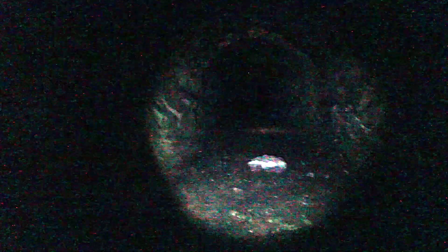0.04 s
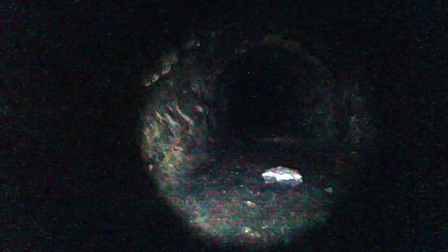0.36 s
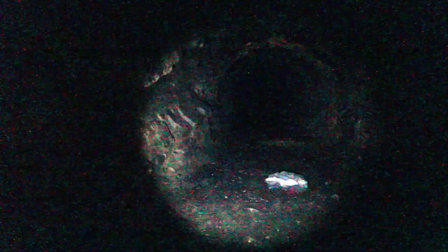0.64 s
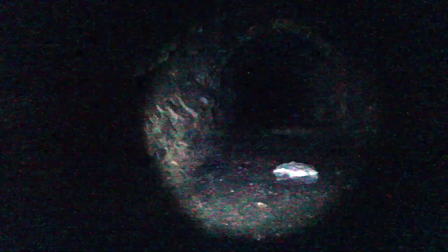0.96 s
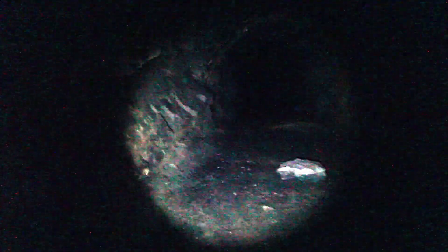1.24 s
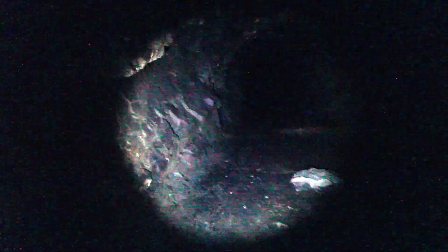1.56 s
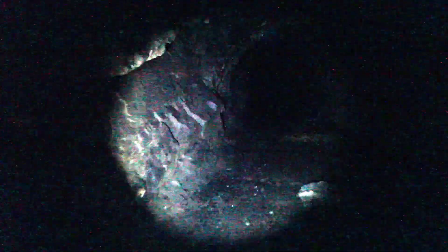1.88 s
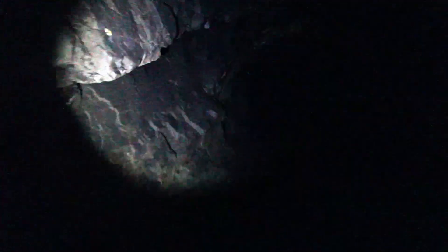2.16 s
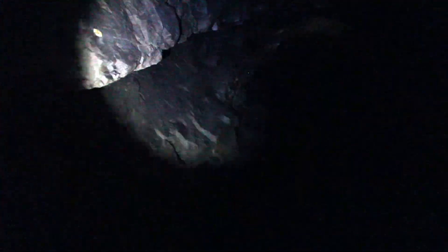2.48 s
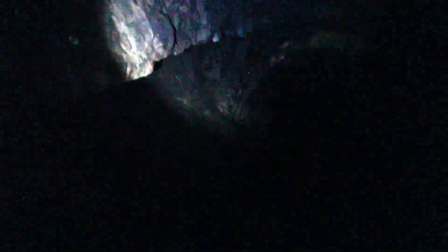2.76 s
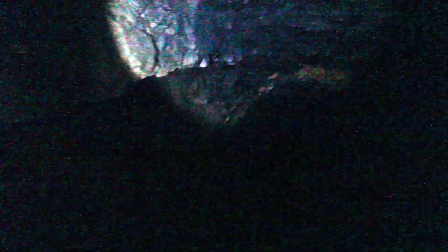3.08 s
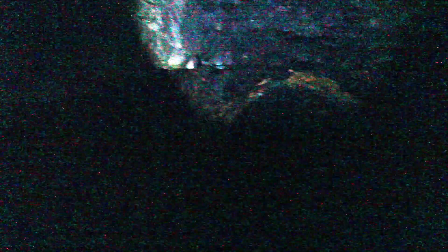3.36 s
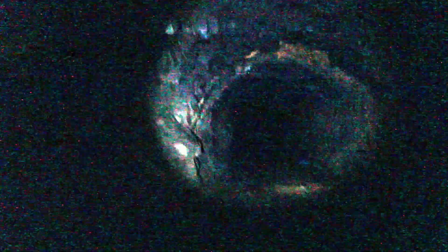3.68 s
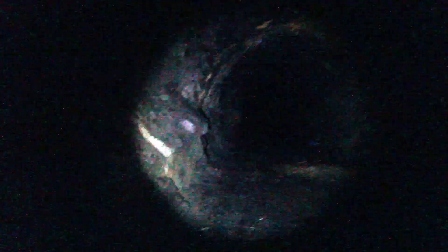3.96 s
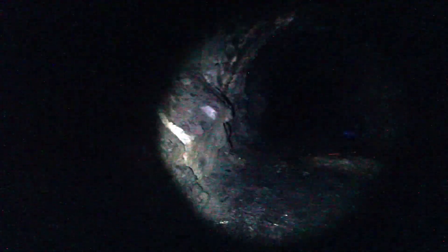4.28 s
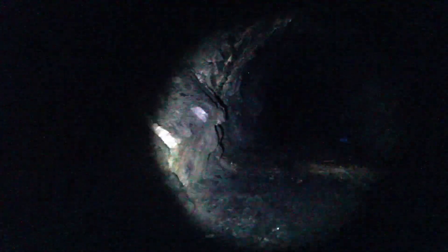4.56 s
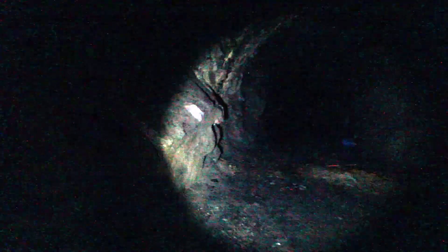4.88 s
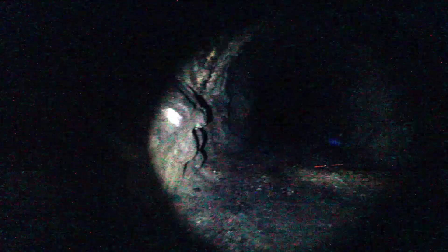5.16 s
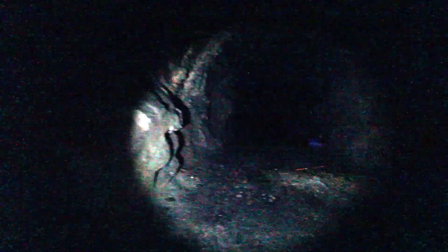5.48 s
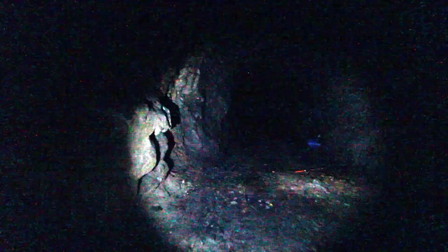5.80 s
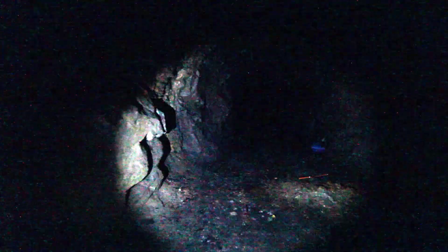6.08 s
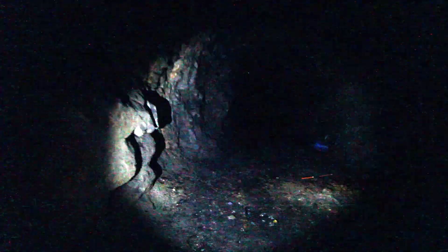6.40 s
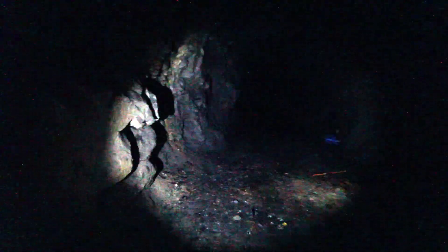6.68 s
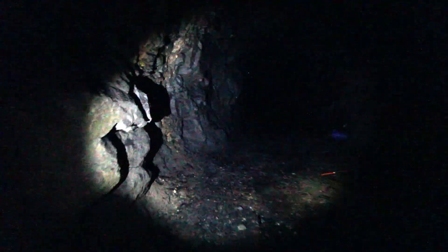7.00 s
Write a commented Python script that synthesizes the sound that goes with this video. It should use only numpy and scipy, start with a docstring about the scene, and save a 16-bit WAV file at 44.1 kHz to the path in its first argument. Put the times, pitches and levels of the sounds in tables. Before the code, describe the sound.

Slow, uneven footsteps crunch and scuff on grit in a rock tunnel, heard close from a microphone in the walker's hand. The walls ring for about a second, and a faint steady hiss lies underneath. The first steps are light, with small pebble clicks, followed by a firmer crunch and clatter around 1.7 seconds. At 2.8 seconds a flat stone tips with a loud hollow knock and grinds briefly as it rocks; another sharp knock follows at 3.1. Quieter steps and clicks continue until several stones clack together between 4.7 and 5 seconds. A heavier step lands at 5.7, and more hollow knocks come from 6.5 to 6.7, with a last scuff near 6.9. A sleeve swishes briefly around 0.8, 3.2 and 4.7 seconds. Soft low bumps of the hand on the microphone come mostly from 4.5 seconds onward.

```python
"""Slow footsteps in a rock tunnel

Grit and loose stones underfoot, heard close from the microphone of a camera in the walker's hand.
Each boot crunches and scuffs, pebbles click, flat stones tip with a hollow knock, and one grinds as
it rocks. Farther out, the rock walls ring on for about a second. Right at the microphone, the hand
bumps the camera softly and a sleeve brushes past, over a faint steady hiss."""
import sys
import numpy as np
from scipy import signal
from scipy.io import wavfile
from scipy.ndimage import uniform_filter1d

SR = 44100
rng = np.random.default_rng(int(sys.argv[2]) if len(sys.argv) > 2 else 0)


def put_to_file(sound):
    """Save the sound as 16-bit audio at rate SR, in the file named by the first command-line argument."""
    columns = np.atleast_2d(sound).T  # one column per channel
    safe = np.clip(columns, -1, 1)
    whole_steps = np.round(safe * 32767)
    wavfile.write(sys.argv[1], SR, whole_steps.astype(np.int16))


N = 314874
TIME = np.arange(N) / SR

# a heel, sole or toe meeting the grit:
# start_s, hold_s, crunch_db, weight_db, rasp_db, fizz_db, sliding_over_pressed_db
FOOTFALLS = [(0.076, 0.098, -47, -50.5, -52.5, -63, -1.5), (.585, 0.028, -55.5, -73, -74, -75, -17),
             (0.864, 0.1, -42, -57.5, -49.5, -54, 2.5), (0.985, 0.032, -44, -48, -54, -68, 1),
             (1.202, 0.027, -50, -53.5, -63, -72, -8), (1.455, .01, -43.5, -69, -53.5, -66, 9),
             (1.601, 0.11, -42.5, -49, -53.5, -70, -0.5), (1.673, .03, -49, -50, -56, -57, 4),
             (1.725, 0.016, -29.5, -55, -44.5, -56, 8), (1.787, 0.045, -37, -50, -45, -55.5, -22),
             (2.453, 0.018, -46, -46.5, -47.5, -55.5, 1), (2.567, 0.026, -41, -53, -52, -70, 0.5),
             (2.69, 0.11, -53, -53, -59, -60, -12), (2.785, 0.034, -47, -64, -56, -74, 6),
             (3.145, 0.015, -34, -44.5, -42, -53, 10), (3.268, 0.063, -36.5, -50, -49, -58, 1),
             (3.854, 0.18, -47.5, -67, -53, -65, 5), (4.059, 0.0086, -37.5, -53.5, -46, -54, 6),
             (4.125, .04, -41.5, -71, -47.5, -56.5, 6), (4.296, 0.087, -44.5, -59.5, -57, -72, 17),
             (4.683, 0.12, -47, -44, -50.5, -59, 16), (4.88, 0.063, -34, -47, -45.5, -53, -0.5),
             (5.156, 0.091, -48, -53.5, -60, -63, 0), (5.506, 0.16, -53.5, -76, -61.5, -64, 0),
             (5.604, .02, -54, -72, -56, -70, 5), (5.684, 0.042, -35.5, -42.5, -47, -56, 3),
             (5.81, 0.041, -44.5, -54, -67, -66, -13), (6.1, 0.22, -47, -58.5, -52, -60, 0.5),
             (6.387, .02, -48, -52.5, -49.5, -61, 3), (6.474, 0.047, -35.5, -39.5, -46.5, -54, -2.5),
             (6.606, 0.023, -37, -43.5, -45, -53.5, -1), (6.88, 0.13, -46, -51.5, -53, -62, 3)]
# spectra of the parts of a step: frequency_hz, gain_db
PRESSED_GRIT = [(300, -25), (480, -14), (600, 3.5), (850, 7), (1100, 4), (1400, -4), (2200, -35.5)]
SLIDING_GRIT = [(750, -18), (1150, 3.5), (1550, 1.5), (1900, -2), (2500, -8.5), (3300, -37.5)]
SOLE_WEIGHT = [(70, -20.5), (150, -0.5), (210, -3), (270, 4), (350, 5.5), (440, 4.5), (540, 0.5),
               (750, -46)]
SAND_RASP = [(1900, -21), (2550, 2), (3000, 1), (3800, -3.5), (5800, -9), (7500, -37)]
DUST_FIZZ = [(4200, -18.5), (5500, 5.5), (7000, 3.5), (9500, -4), (13000, -8), (16000, -15)]
# stones struck by a boot or by each other: start_s, level_db, pitch_hz, thud_db, dullness_db_per_octave
KNOCKS = [(0.0768, -41.5, 550, -62, 11), (.0992, -39.5, 800, -60, 17), (0.147, -32.5, 1830, -44, 45),
          (0.2811, -44.5, 2600, -70, 19), (0.4135, -45.5, 2780, -66, 34), (0.4619, -42.5, 1400, -39.5, 10),
          (0.5748, -43.5, 550, -56, 12), (0.7155, -49.5, 900, -70, 9), (0.8564, -36, 1770, -47, 28),
          (1.4602, -35.5, 1420, -39.5, 17), (1.6169, -31, 660, -52, 12), (1.7344, -25.5, 1130, -50, 19),
          (1.7391, -30.5, 2100, -65, 29), (1.7712, -25, 1350, -57, 27), (1.839, -34.5, 1600, -52, 14),
          (2.3668, -38, 1800, -41.5, 11.5), (2.3915, -36.5, 900, -36.5, 16), (2.457, -62, 500, -37.5, 15),
          (2.5886, -32.5, 1120, -68, 23), (2.809, -13, 1180, -33, 16.5), (2.815, -15, 625, -44, 12),
          (3.0478, -44, 1400, -70, 25), (3.1386, -18, 920, -38, 13), (3.16, -29.5, 1630, -32.5, 18),
          (3.3046, -28.5, 1180, -61, 16), (3.3834, -38, 1000, -48, 10), (3.5993, -43, 897, -58, 9),
          (3.7674, -43.5, 1120, -64, 32), (3.8735, -43, 1300, -70, 12), (3.878, -53, 4500, -73, 24),
          (3.922, -44, 1280, -62, 13), (3.983, -36.5, 1360, -70, 14), (4.074, -37, 1520, -42.5, 17),
          (4.14, -34.5, 980, -64, 13), (4.308, -47, 1500, -52, 14), (4.3396, -46, 2000, -70, 21),
          (4.3864, -33.5, 1220, -54, 28), (4.5285, -46, 696, -54, 6), (4.713, -32, 2840, -75, 17.5),
          (4.7222, -35, 1500, -46, 20), (4.793, -24.5, 800, -31.5, 11.5), (4.8446, -28.5, 2150, -37.5, 8.5),
          (4.878, -30.5, 2150, -56, 32), (4.9194, -17.5, 1780, -29, 11), (4.9666, -19, 1540, -55, 11),
          (5.0287, -37.5, 2090, -50, 25), (5.166, -35.5, 695, -47, 10), (5.1798, -35.5, 1100, -57, 19),
          (5.2158, -38.5, 2180, -56, 18), (5.267, -34, 820, -48, 19), (5.7001, -41, 1180, -46, 18),
          (6.068, -47.5, 2000, -84, 9), (6.1226, -43.5, 3900, -73, 28), (6.183, -40, 2000, -70, 18),
          (6.237, -41.5, 2140, -75, 11.5), (6.4934, -26, 450, -45, 16), (6.5363, -39, 700, -35, 14),
          (6.6212, -14, 1020, -29.5, 15), (6.6776, -31, 660, -60, 12), (6.7003, -23.5, 820, -67, 12.5),
          (6.7279, -27.5, 680, -38, 16), (6.938, -36.5, 1100, -50, 12)]
# spectrum of the ground under a knock: frequency_hz, octave_level_db
GROUND_THUD = [(25, -36), (70, -12), (130, -18.5), (240, -0.5), (765, -4), (3000, -60)]
# broad resonances of the loose stones: frequency_hz, width_hz
STONE_RESONANCES = [(900, 500), (2200, 800), (3300, 700), (4400, 800), (5900, 1000), (11000, 2500)]
# colour that the struck stones share: frequency_hz, gain_db
STONE_COLOUR = [(150, -1.5), (400, -3.5), (800, -2.5), (1050, -1), (1300, -3), (1600, 0.5), (2100, -1),
                (2900, -0.5), (4000, -2.5), (5800, 9), (9500, 5), (12500, 15)]
# notes of the stones that ring or tip hollowly: start_s, pitch_hz, level_db, t60_s
HOLLOW_NOTES = [(1.736, 1680, -19, .035), (2.3669, 2490, -21.5, 0.011), (2.8142, 239, -12, 0.035),
                (2.8105, 743, -21.5, 0.12), (3.1397, 580, -6.5, 0.013), (4.389, 1460, -27, 0.018),
                (4.7125, 2030, -19.5, 0.022), (4.7125, 2580, -18, 0.015), (4.922, 1160, -21, 0.029),
                (2.3661, 1180, -32, 0.029), (2.8102, 1630, -35, 0.015), (2.809, 2990, -17.5, 0.018),
                (2.81, 4780, -29, 0.023), (3.1395, 1920, -17.5, 0.031), (4.7934, 333, -16, 0.047),
                (4.8448, 2300, -1.5, 0.0053), (4.9667, 806, -15.5, 0.035), (4.9647, 1430, -17, 0.036),
                (5.168, 327, -29.5, 0.061), (5.267, 282, -33.5, 0.12), (5.701, 544, -27.5, 0.1),
                (6.4927, 712, -26, 0.19), (6.6224, 566, -18.5, 0.14), (6.6235, 1030, -16, .04)]
# modes of the stone that rocks under a boot: pitch_hz, width_hz, level_db
SLAB_MODES = [(441, 90, -5), (755, 200, -2), (1120, 180, -3), (1290, 150, -2), (1620, 220, -3),
              (1960, 180, -8), (3000, 500, -18)]
# grit catching under that stone: centre_s, level_db, half_width_s
JUDDERS = [(2.806, -16, 0.011), (2.845, -26.5, 0.012)]
# decay of the tunnel's echo: frequency_hz, t60_s
TUNNEL_DECAY = [(150, 2.4), (530, 1.43), (1400, 0.6), (3700, 1.44), (8000, 0.5), (15000, 0.34)]
# the hand bumping the camera: centre_s, peak_db, pitch_hz
HAND_BUMPS = [(1.29, -52, 50), (1.41, -49, 60), (1.56, -51, 55), (1.85, -51, 55), (2.24, -51, 42),
              (4.56, -39, 71), (4.579, -42, 59.7), (4.668, -36, 59), (4.832, -39, 85), (5.325, -38.5, 78),
              (5.37, -72, 59.7), (5.44, -43, 55), (5.525, -35.5, 54.5), (5.65, -40.5, 75),
              (5.683, -38.5, 69.6), (5.852, -40, 55), (6.12, -45, 48.7), (6.211, -44, 60), (6.29, -47, 50),
              (6.861, -35.5, 66)]
# a jacket sleeve brushing close to the microphone: start_s, peak_db, length_s
RUSTLES = [(0.834, -45, 0.055), (1.262, -54, 0.075), (1.822, -58, .04), (3.165, -38.5, 0.014),
           (3.236, -48, 0.037), (4.647, -42.5, 0.069), (4.732, -46, 0.11), (4.93, -56, .04)]
# spectra of the sleeve, the grip's rumble and the background hiss: frequency_hz, gain_db
SLEEVE_SPECTRUM = [(1500, -4), (4000, 2.5), (7500, -1.5), (11000, -1.5), (13500, -0.5), (16000, 3.5)]
GRIP_SPECTRUM = [(12, -20), (30, -1), (50, 0), (95, -3), (170, -12), (500, -55)]
HISS_SPECTRUM = [(24, -42), (40, -11), (54, -10), (189, -5), (268, -0.5), (1140, -2), (8040, -17),
                 (14700, -20), (15800, -17.5)]


def steps(shuffle_db=-73.5):
    """Boots close by: the same cracking grit sounds in every part of a step, over the sole's smooth rub."""
    _, _, crunch_db, weight_db, rasp_db, fizz_db, slide_db = np.transpose(FOOTFALLS)
    pressed_db = crunch_db - 10 * np.log10(1 + gain_of(slide_db) ** 2)
    shuffle = gain_of(shuffle_db)  # the crunch that goes on between steps
    pressed = np.hypot(footfall_envelope(pressed_db, fall_db_per_s=68), shuffle)
    sliding = np.hypot(footfall_envelope(pressed_db + slide_db, fall_db_per_s=68), shuffle)
    weight = footfall_envelope(weight_db, fall_db_per_s=55.5)
    rasp = footfall_envelope(rasp_db, fall_db_per_s=77)
    fizz = footfall_envelope(fizz_db, fall_db_per_s=74)
    grit = passing_walls(cracking_grit(per_s=1800, spread_db=3.5, clump_db=4.5), echo_db=1.0)
    crunch = np.hypot(pressed, sliding)
    memory = np.exp(-1 / (.08 * SR))
    recent_crunch = signal.lfilter([1 - memory], [1, -memory], crunch)
    sharpness = np.clip(crunch / recent_crunch, .3, 1)  # as a step dies away, echoes blur its grains

    def texture(spectrum, max_grit):
        """Grit takes up to max_grit of the power and rub the rest, in one colour."""
        share = np.clip(max_grit * sharpness, 0, 1)
        rub = rng.standard_normal(N)
        return unit_rms(coloured(np.sqrt(share) * grit + np.sqrt(1 - share) * rub, spectrum))

    gravel = pressed * texture(PRESSED_GRIT, 0.62) + sliding * texture(SLIDING_GRIT, 0.46)
    sole = weight * texture(SOLE_WEIGHT, 0.65)
    sand = rasp * texture(SAND_RASP, 0.49)
    dust = fizz * texture(DUST_FIZZ, .35)
    return gain_of(-1.5) * (gravel + sole + sand + dust)


def footfall_envelope(levels_db, fall_db_per_s, attack_s=0.018, sag_db_per_s=17.5):
    """Each footfall builds, sags while the boot bears down, then dies away; overlaps add in power."""
    t, power = np.arange(2 * SR) / SR, np.zeros(N)
    attack = np.minimum(t / attack_s, 1)
    for (start_s, hold_s, *_), db in zip(FOOTFALLS, levels_db):
        held_s = np.clip(t - attack_s, 0, hold_s)
        released_s = np.maximum(t - attack_s - hold_s, 0)
        envelope = attack * gain_of(db - sag_db_per_s * held_s - fall_db_per_s * released_s)
        add(power, start_s, envelope ** 2)
    return np.sqrt(power)


def cracking_grit(per_s, spread_db, clump_db):
    """Grit cracks in clumps: many small clicks and a few large ones."""
    sizes = gain_of(spread_db * np.minimum(rng.exponential(1, N), 4.5)) * rng.choice([-1, 1], N)
    clumps = unit_rms(uniform_filter1d(rng.standard_normal(N), size=350))
    return unit_rms(sizes * random_hits(N, per_s) * gain_of(clump_db * clumps))


def stone_knocks(scatter_t60_s=0.028, scatter_hz=2600, crumble_t60_s=0.027):
    """One sharp contact, then a quick scatter of duller ones as the stone settles and sand crumbles."""
    t, out = np.arange(SR // 6) / SR, np.zeros(N)
    for start_s, db, pitch_hz, thud_db, dullness in KNOCKS:
        scatter, crumble = rng.standard_normal((2, len(t))) * random_hits((2, len(t)), per_s=3000)
        scatter = unit_rms(scatter * gain_of(-60 * t / scatter_t60_s) * (1 - np.exp(-t / 0.0003)))
        scatter = signal.lfilter(*signal.butter(2, scatter_hz, fs=SR), scatter)
        crumble = unit_rms(crumble * gain_of(-60 * t / crumble_t60_s))
        contacts = (gain_of(-4) * scatter + gain_of(-19) * crumble) / np.sqrt(len(t))
        contacts *= gain_of(-2.5 * np.log2(pitch_hz / 1170))  # big, low stones scatter more than pebbles
        contacts[0] += 1  # the first, sharp contact
        # faint knocks are farther from the microphone, so the walls weigh more
        contacts = near_walls(contacts, echo_db=-8 - 0.33 * (db + 38.5))
        knock = coloured(contacts, knock_spectrum(db, pitch_hz, thud_db, dullness))
        add(out, start_s, gain_of(-3) * knock)
    for hz, width_hz in STONE_RESONANCES:
        out = stone_dispersion(out, hz, width_hz)
    return coloured(out, STONE_COLOUR)


def knock_spectrum(db, pitch_hz, thud_db, dullness, half_width_octaves=0.38, thinning_db_per_octave=11):
    """A hump around the stone's pitch, duller for a softer contact, over the thud of the ground."""
    hz = np.geomspace(25, 17000, 40)
    octaves = np.log2(hz / pitch_hz)
    bass_loss_db = thinning_db_per_octave * np.maximum(-octaves - half_width_octaves, 0)
    treble_loss_db = dullness * np.maximum(octaves - half_width_octaves, 0)
    stone = gain_of(db - bass_loss_db - treble_loss_db)
    ground = gain_of(thud_db + curve_at(GROUND_THUD, hz))
    per_hz = np.sqrt(SR / 100 * SR / 2 / hz)  # turns octave levels over 10 ms into filter gain
    return np.c_[hz, 20 * np.log10(per_hz * np.hypot(stone, ground))]


def stone_dispersion(x, hz, width_hz):
    """A stone holds back the sound near its resonance, so a click leaves it as a few swings."""
    radius = np.exp(-np.pi * width_hz / SR)
    poles = np.array([1, -2 * radius * np.cos(2 * np.pi * hz / SR), radius ** 2])
    return signal.lfilter(poles[::-1], poles, x)


def hollow_stones(attack_s=0.0015):
    """Flat stones and the gaps under them ring briefly."""
    t, out = np.arange(SR // 4) / SR, np.zeros(N)
    attack = 1 - np.exp(-t / attack_s)
    for start_s, hz, db, t60_s in HOLLOW_NOTES:
        add(out, start_s, attack * gain_of(db - 60 * t / t60_s) * np.sin(2 * np.pi * hz * t))
    return out


def grinding_slab(start_s=2.811, crest_s=2.841, rise_db_per_s=286, fall_db_per_s=750, slip_hz=1900):
    """The rocking stone sticks and slips at its lowest mode; grit in the joint shakes all its modes."""
    t, out = np.arange(SR // 8) / SR, np.zeros(N)
    past_crest_s = start_s + t - crest_s
    swell = gain_of(-20 + np.minimum(rise_db_per_s * past_crest_s, -fall_db_per_s * past_crest_s))
    note = swell * np.sqrt(2) * np.sin(2 * np.pi * SLAB_MODES[0][0] * t)
    judder = sum(gain_of(db) * np.exp(-((start_s + t - centre_s) / half_width_s) ** 2)
                 for centre_s, db, half_width_s in JUDDERS)
    slips = rng.choice([-1, 1], len(t)) * random_hits(len(t), per_s=3000)
    slips = signal.lfilter(*signal.butter(2, slip_hz, fs=SR), slips)
    shaken = np.zeros(len(t))
    for hz, width_hz, db in SLAB_MODES:
        mode = np.exp(-np.pi * width_hz * t) * np.cos(2 * np.pi * hz * t)
        shaken += gain_of(db) * unit_rms(signal.fftconvolve(slips, mode)[:len(t)])
    add(out, start_s, note + judder * unit_rms(shaken))
    return out


def near_walls(x, echo_db):
    """The first echoes from the near walls and roof colour a sound and double its clicks."""
    t = np.arange(SR // 30) / SR
    taps = rng.standard_normal(len(t)) * random_hits(len(t), per_s=900)
    taps *= np.exp(-t / .012) * (t > .001)
    taps *= gain_of(echo_db) / (np.linalg.norm(taps) + 1e-9)
    taps[0] = 1  # the direct path to the microphone
    return signal.fftconvolve(x, taps / np.linalg.norm(taps))[:len(x)]


def passing_walls(x, echo_db, cycle_hz=1.3):
    """The walker moves on, so three sets of wall echoes take over from each other in turn."""
    fades = np.array([np.maximum(np.cos(2 * np.pi * (cycle_hz * TIME - k / 3)) + .5, 0) for k in range(3)])
    fades /= np.linalg.norm(fades, axis=0)
    return sum(near_walls(x * fade, echo_db) for fade in fades)


def tunnel_echo(x):
    """Dense echoes off rough rock; the high treble dies first."""
    t = np.arange(SR) / SR
    taps = rng.standard_normal(SR) * random_hits(SR, per_s=4000) * (1 - np.exp(-t / 0.002))
    hz, age_s, bands = signal.stft(taps, SR, nperseg=256)
    decay = gain_of(-60 * age_s / curve_at(TUNNEL_DECAY, hz)[:, None])
    _, tail = signal.istft(bands * decay, SR, nperseg=256)
    return signal.fftconvolve(x, tail / np.linalg.norm(tail))[:N]


def handling(grip_db=-75, stir_db=-16.5, stir_s=0.096):
    """Soft low pushes through the camera body, over a rumble of the grip that swells around each."""
    t = np.arange(-SR // 20, SR // 20) / SR
    stirs = [gain_of(db + stir_db) * np.exp(-abs(TIME - centre_s) / stir_s)
             for centre_s, db, _ in HAND_BUMPS]
    out = shaped_noise(GRIP_SPECTRUM) * np.hypot(gain_of(grip_db), np.max(stirs, axis=0))
    for centre_s, db, hz in HAND_BUMPS:
        push = np.cos(2 * np.pi * hz * t) * np.exp(-(2 * t * hz) ** 2)
        add(out, centre_s + t[0], gain_of(db) * push)
    return out


def sleeve():
    """Cloth swishes beside the microphone: a quick rise and a slower fall of bright noise."""
    t, swell = np.arange(SR // 4) / SR, np.zeros(N)
    for start_s, db, length_s in RUSTLES:
        age = t / (length_s / 4)
        add(swell, start_s, gain_of(db) * age * np.exp(1 - age))
    return swell * shaped_noise(SLEEVE_SPECTRUM)


def background_hiss(level_db=-51.5):
    """A faint, steady hiss behind everything."""
    return gain_of(level_db) * shaped_noise(HISS_SPECTRUM)


def shaped_noise(spectrum):
    """Noise with the given spectrum, at rms 1."""
    return unit_rms(coloured(rng.standard_normal(N), spectrum))


def coloured(x, spectrum, size=4096):
    """Gives x a spectrum through a minimum-phase filter, so that attacks stay sharp."""
    hz = abs(np.fft.fftfreq(size, 1 / SR))
    log_gain = np.log(gain_of(curve_at(spectrum, hz)))
    response = np.exp(np.conj(signal.hilbert(log_gain)))
    taps = np.fft.ifft(response).real[:size // 2]
    return signal.fftconvolve(x, taps)[:len(x)]


def curve_at(table, hz):
    """Reads a table on a log-frequency axis."""
    table_hz, values = np.transpose(table)
    return np.interp(np.log(hz + 1), np.log(table_hz + 1), values)


def random_hits(shape, per_s):
    """Marks random samples, per_s a second on average."""
    return rng.random(shape) < per_s / SR


def gain_of(db):
    """Decibels to gain."""
    return 10 ** (np.asarray(db) / 20)


def unit_rms(x):
    """Scales to rms 1."""
    return x / np.sqrt(np.mean(x ** 2) + 1e-20)


def add(mix, start_s, sound):
    """Mixes a sound in at start_s."""
    part = mix[round(start_s * SR):][:len(sound)]
    part += sound[:len(part)]


def scene():
    """In mono: steps and stones close by, their echo in the tunnel, the hand, the sleeve and the hiss."""
    boots, knocks = steps(), stone_knocks()
    echo = tunnel_echo(gain_of(-10.5) * boots + gain_of(-18.5) * knocks)
    hiss = background_hiss()
    return (boots + knocks + hollow_stones() + grinding_slab() + echo + handling() + sleeve() + hiss)[None]


def record(dry, open_s=.068, fade_s=.004, offset=.001, cutoff_hz=16000):
    """The microphone, with a tiny steady offset, opens just after the start; the top treble is cut."""
    opened = (dry + offset) * np.clip((TIME - open_s) / fade_s, 0, 1)
    lowpass = signal.firwin(511, cutoff_hz, window=("kaiser", 9), fs=SR)
    return signal.oaconvolve(opened, lowpass[None], "same")


dry = scene()
out = record(dry)
put_to_file(out)
```